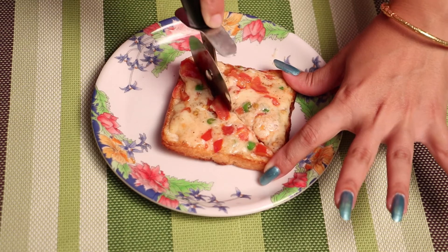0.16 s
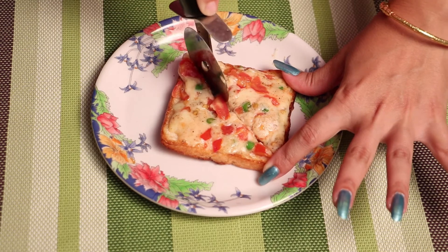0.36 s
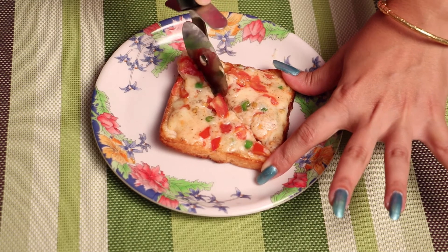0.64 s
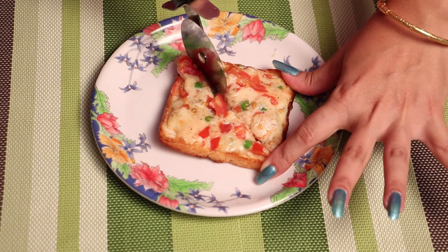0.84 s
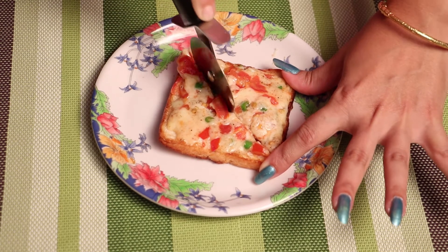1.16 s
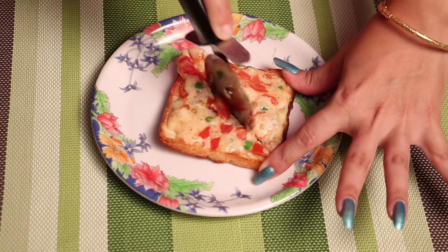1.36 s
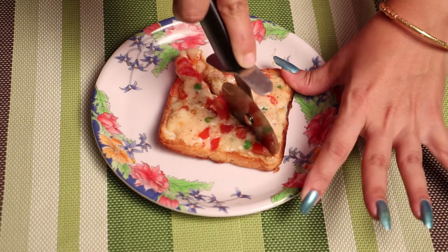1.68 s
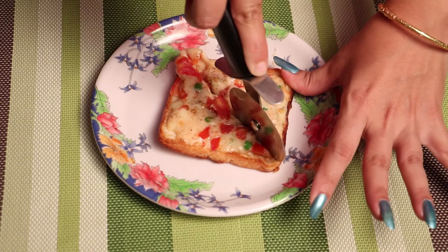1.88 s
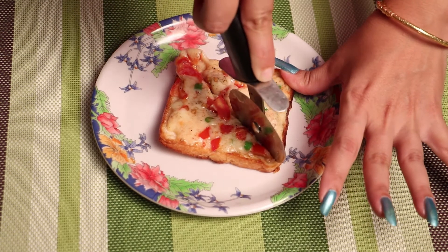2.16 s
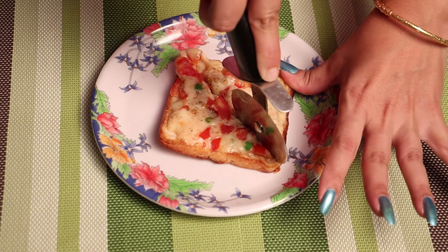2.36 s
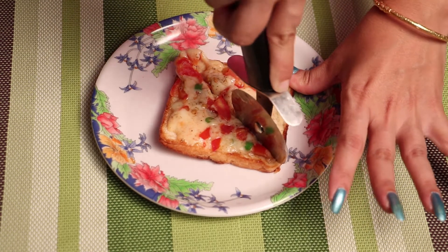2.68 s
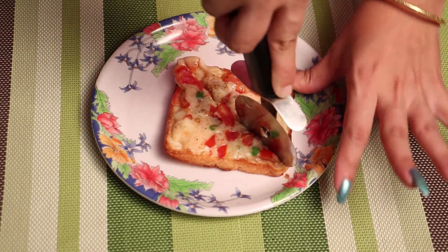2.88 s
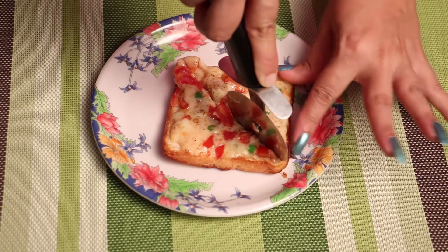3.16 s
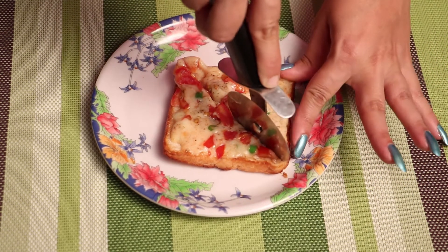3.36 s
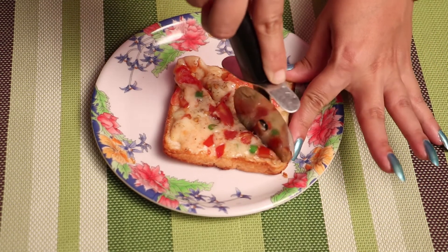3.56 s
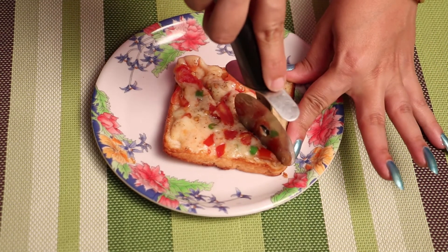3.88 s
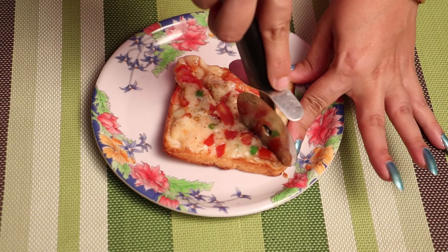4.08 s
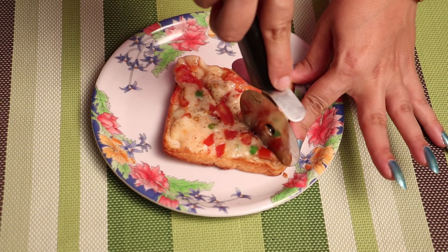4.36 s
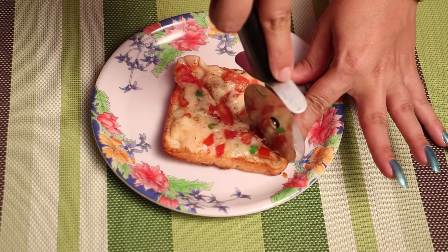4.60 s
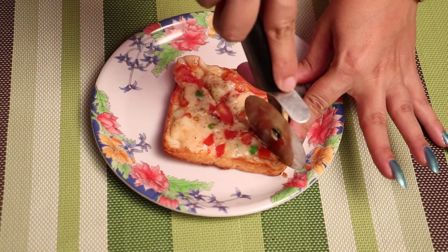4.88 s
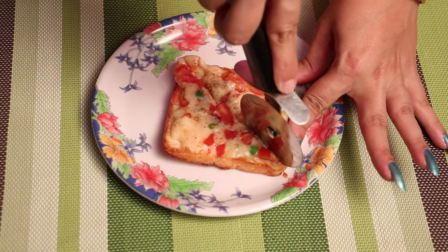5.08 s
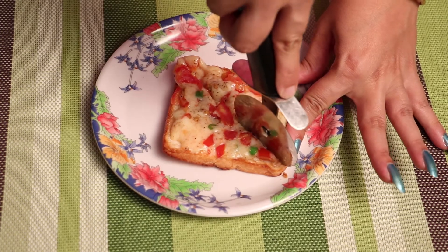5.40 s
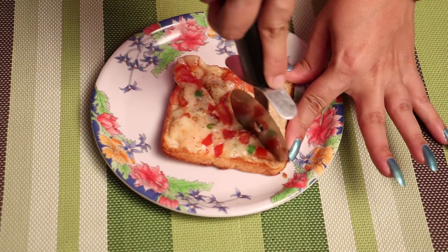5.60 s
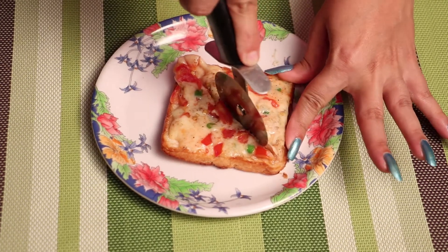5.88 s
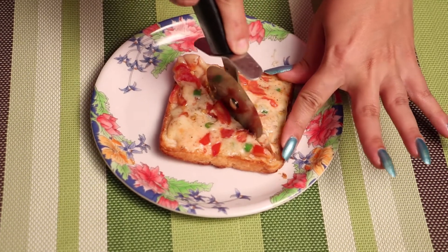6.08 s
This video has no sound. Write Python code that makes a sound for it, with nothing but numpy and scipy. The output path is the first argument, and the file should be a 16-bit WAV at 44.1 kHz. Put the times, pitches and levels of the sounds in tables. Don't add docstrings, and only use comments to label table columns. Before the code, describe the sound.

Crisp bread breaks in irregular, dry, bright cracks under a rolling metal cutter, starting abruptly and loudest in the first second. A hard thud and ceramic clack lands around one and a half seconds. Later come scattered crumbs, hollow plate rocking, tiny metallic ticks and a last quieter run of crunches. Close microphone, bare reverberant kitchen, soft low rumble, motor hum and slight hiss.

```python
import sys
import numpy as np
from scipy import signal
from scipy.fft import rfft, irfft
from scipy.io import wavfile

SR = 44100
rng = np.random.default_rng(int(sys.argv[2]) if len(sys.argv) > 2 else 0)


def digitize_waveform(pressure):
    field = np.atleast_2d(pressure).T
    bounded = np.clip(field, -1, 1)
    quanta = np.round(bounded * 32767).astype(np.int16)
    wavfile.write(sys.argv[1], SR, quanta)


def decibels_to_gain(level_db):
    exponent = np.asarray(level_db, float) / 20
    return 10 ** exponent


N = 275130

# start in seconds, peak level in dB, share of big flakes in dB.
FIRST_ROLL = [(0.0014, -12, -7), (0.0863, -18.5, -4.5), (0.14, -25, 1), (0.1476, -23.5, -0.5),
              (0.2024, -19, -3), (0.208, -27.5, 9), (0.212, -26, 4), (0.237, -15.5, -4.5), (0.261, -27, -5),
              (0.3027, -18, -14), (0.3144, -19, -17), (0.3245, -16.5, -15), (0.333, -20, -12),
              (0.3453, -30.5, 9), (0.3635, -17, -6.5), (0.404, -14.5, -10), (0.428, -18.5, -11.5),
              (0.4433, -18.5, -12), (0.4943, -33, -6), (0.5066, -19, 4), (0.5592, -19, -3),
              (0.5677, -9.5, -14), (0.5729, -15.5, -4), (0.6608, -19, -5), (0.718, -17.5, -7),
              (0.7236, -20.5, -16), (0.7604, -22, -21)]
SECOND_ROLL = [(0.896, -39, 5), (0.939, -41, -4), (0.9496, -37, -9), (0.9989, -24.5, -5), (1.013, -32, 1),
               (1.038, -29, -4), (1.0444, -23, -2), (1.0501, -18, 1.5), (1.0582, -16, -1), (1.063, -21, -5),
               (1.118, -25, -6), (1.1619, -21.5, -9), (1.185, -26, 0), (1.245, -29, -3), (1.2555, -36, -11),
               (1.262, -30.5, 4), (1.2995, -39, -8), (1.311, -30, -2), (1.316, -25, 0), (1.3337, -26, 1.5),
               (1.347, -27, -4), (1.3604, -24, 0), (1.393, -30, 4.5), (1.4447, -17.5, -19),
               (1.457, -27, -2), (1.498, -19.5, -2), (1.531, -19, -14), (1.558, -21.5, -8),
               (1.585, -26.5, 2)]
THIRD_ROLL = [(1.703, -31, -9), (1.728, -27, -3), (1.775, -32.5, -2), (1.797, -30, -1.5), (1.809, -29, -4),
              (1.8332, -25, -7), (1.8606, -23, -12), (1.8928, -22.5, -6), (1.9015, -19.5, -5),
              (1.9607, -33, -15), (1.9896, -21.5, -10.5), (2.092, -30, 1.5), (2.1, -12.5, -13.5),
              (2.148, -29, 1), (2.1577, -25, -14), (2.3137, -24.5, -2.5), (2.334, -44, -20),
              (2.3477, -20, -13), (2.391, -43, -13), (2.4063, -30, -5), (2.415, -34, -13),
              (2.4518, -30, -6), (2.491, -27, -15)]
ROCKING = [(2.612, -46, -2), (2.7495, -36, -4.5), (2.82, -43, -25), (2.829, -32.5, -20), (2.838, -33, -15),
           (2.8576, -39, -13), (2.872, -27, -18), (2.877, -22, -24), (2.8825, -19, -12), (2.899, -33, -7),
           (2.902, -33.5, -13), (2.992, -36, -2), (2.998, -41.5, 4.5), (3.0373, -27.5, -13),
           (3.0484, -37, -12), (3.13, -47, 10), (3.15, -47, -2), (3.251, -49, 3), (3.2633, -35.5, 2.5),
           (3.697, -43, -3), (3.7358, -31.5, -3.5), (3.8026, -31, -14)]
SAWING = [(4.025, -26, -14), (4.0289, -23, -6.5), (4.0447, -20, -11), (4.0614, -23, -20),
          (4.0664, -25, -14), (4.0866, -39, -19), (4.176, -38, -25), (4.2102, -25.5, -11.5),
          (4.273, -50, -20), (4.3002, -48, -17), (4.3221, -36.5, -4.5), (4.345, -45, -12),
          (4.4716, -45.5, 12.5), (4.4786, -30.5, -28), (4.496, -39, 2), (4.844, -37, 0), (4.8604, -31, -10),
          (4.8837, -39.5, 14.5), (5.001, -44, -17), (5.031, -42, -18), (5.047, -41, -17), (5.063, -40, -10),
          (5.1, -43, -15), (5.118, -45, -20), (5.163, -43, -10), (5.1851, -43, -25), (5.2055, -39, -10),
          (5.2257, -28, -3), (5.235, -19.5, 0.5), (5.2424, -37, -17), (5.253, -34, -20), (5.31, -49, -25),
          (5.42, -43.5, -8)]
LAST_ROLL = [(5.585, -46, -8), (5.5967, -47, -2), (5.6143, -43, -2), (5.6746, -32.5, -7), (5.709, -26, -7),
             (5.723, -36, -10), (5.739, -41, -15), (5.7473, -35, -9), (5.761, -28, -12),
             (5.7774, -21.5, -3), (5.7915, -19, -7.5), (5.8431, -43, -26), (5.869, -32, -10),
             (5.89, -30, -11), (5.915, -37, -9), (5.925, -39, -10), (5.9438, -27, -16), (5.9763, -31, -17),
             (6.008, -30, -2), (6.0415, -28.5, -10), (6.0544, -31, -8), (6.0845, -24, -7),
             (6.0915, -25.5, -6), (6.111, -32, -6), (6.133, -33, -3), (6.141, -31, -6), (6.149, -32, -9),
             (6.1605, -25, -6), (6.172, -29.5, -2), (6.204, -33, -12)]
# start in seconds, peak level in dB, share of
# big flakes in dB.
STRAY_CRUMBS = [(1.2323, -36, -2), (2.915, -40, 6), (3.635, -43, -8), (3.684, -47, 0), (3.713, -40, -2),
                (3.75, -43, -3), (3.762, -38, -4), (4.052, -36, -1), (5.701, -43, -9)]
CRUMBS_DB = [-25, -13, -17, -15, -13.5, -22, -18]
CRUMBS_PER_FLAKE = -0.35

# start in seconds, hold in seconds, crunch level in dB,
# share of big flakes in dB, level of the plate rubbing in dB.
PUSHES = [(0.0, 0.0049, -33, 4, -35.5), (0.175, 0.069, -42.5, 4, -42.5), (0.296, 0.14, -45.5, 7, -52.5),
          (0.517, 0.24, -53, 13, -48), (1.041, 0.011, -39.5, 3, -39.5), (1.09, 0.08, -44, 8, -89),
          (1.26, 0.15, -39, 6.5, -49.5), (1.495, 0.074, -46, -6, -43.5), (1.795, 0.15, -46, 0.5, -53),
          (2.108, 0.055, -45.5, -8, -52.5), (2.312, 0.18, -49.5, -5, -66.5), (2.603, 0.14, -59.5, -15, -78),
          (2.853, 0.028, -47, 1.5, -54), (3.055, 0.22, -61, -2, -67), (3.697, 0.069, -57, 4, -62),
          (4.05, 0.02, -66, 13, -55.5), (4.858, 0.033, -54, -1, -56), (5.224, 0.024, -43, -4, -48.5),
          (5.277, 0.043, -73, -4, -62), (5.606, 0.063, -51, -8, -68), (5.722, 0.12, -38.5, 1.5, -47),
          (5.92, 0.14, -44.5, 5, -60.5), (6.126, 0.061, -47, 5.5, -57.5)]
BITE_DB_PER_S, CRUNCH_FALL_DB_PER_S, RUB_FALL_DB_PER_S = 441, 197, 65

# pitch in Hz, width in Hz, level in dB.
CRUST_FAR = [(2400, 300, 1), (3240, 270, -2), (3890, 710, -8.5), (5670, 450, -1.5), (6200, 340, -3),
             (7600, 740, -5), (8720, 530, -4), (9400, 700, 5), (12100, 1400, -21), (13600, 2800, -11)]
CRUST_CORNER = [(2380, 450, 1.5), (2700, 660, -2), (3130, 320, -5), (5700, 720, 0.5), (6270, 320, 1),
                (7540, 250, 0), (8800, 430, 3), (9700, 530, -2), (12000, 1400, -22), (13600, 2700, -15)]
CRUST_SCORED = [(2330, 160, 0), (2700, 470, -0.5), (3730, 330, -6), (5370, 180, 2), (6300, 400, -4.5),
                (7600, 450, -2.5), (8100, 400, -1), (9150, 790, -1), (10300, 600, -17), (13400, 3600, -12)]
CRUST_NEAR = [(2430, 190, 1), (3530, 430, -1.5), (4400, 1200, -5.5), (5590, 330, 1.5), (7000, 730, -4.5),
              (7440, 500, -11), (8270, 630, -2.5), (8600, 1750, 0), (11900, 540, -4.5), (14000, 2500, -10)]
CRUST_ROCKED = [(2410, 270, 0), (3100, 250, -18), (3450, 470, -0.5), (5630, 310, -1.5), (6250, 510, -3),
                (7140, 600, -7), (8340, 400, -1), (8900, 790, -0.5), (11000, 950, -6.5), (12500, 1700, -7)]
CRUST_MIDDLE = [(2430, 130, 4.5), (3250, 120, 4.5), (4200, 910, -9), (5850, 610, -2), (6300, 260, -14),
                (7160, 1400, -13), (8560, 600, 1), (9700, 580, -1.5), (12000, 1300, -16),
                (13500, 4100, -14)]
CRUST_HARD = [(2320, 330, 2), (2960, 400, -1), (4200, 310, -13), (4820, 540, 4), (6000, 310, 0.5),
              (7450, 600, -18), (8100, 320, 4), (9100, 690, 1.5), (12600, 460, 1), (13500, 2100, -7)]
CRUST_BROKEN = [(2490, 270, 6.5), (3360, 180, 2), (4400, 500, -15), (5300, 480, -1), (6760, 260, 1.5),
                (7600, 710, -12), (8360, 590, -0.5), (9560, 600, 0.5), (12400, 500, -4), (14000, 1800, -9)]
CRUST_SPLIT = [(2680, 300, 1), (3740, 190, 1), (2170, 520, -1), (5020, 220, -0.5), (6600, 400, -7),
               (7600, 280, 1), (8650, 580, -5.5), (9900, 680, -4.5), (12100, 800, -5.5), (14400, 1800, -20)]
CRUST_EDGE = [(2090, 200, 1), (3100, 410, 2.5), (3730, 570, -22), (4350, 340, -2), (5230, 390, 3),
              (6360, 500, -11), (7530, 400, 3), (8900, 1100, 1), (12300, 1000, -7), (14400, 1800, -24)]
PLACES_FROM_S = [0, .85, 1.22, 1.65, 2.56, 3.95, 4.28, 4.95, 5.55, 5.88]

# start in seconds, peak level in dB, pitch in Hz.
FLAKES = [(.087, -34, 5700), (.325, -20, 6000), (.3645, -27, 5700), (.5082, -17, 5700), (.5748, -27, 5840),
          (1.3605, -30, 2700), (1.446, -16, 3060), (2.878, -32, 3670), (3.039, -39, 3100),
          (3.738, -36, 4380), (4.0455, -34, 8600), (4.087, -35, 5000), (4.48, -41, 8100),
          (4.498, -38, 4900), (5.749, -36, 5000), (6.087, -28, 3030), (6.162, -29, 2970)]

# start in seconds, table thud in dB, brightness in dB, plate clack in dB.
KNOCKS = [(0.001, -19, -16, -15), (0.508, -32, 4, -26), (0.575, -29.5, 16.5, -23.5),
          (0.599, -30.5, 10, -39), (1.047, -27, 2, -29), (1.062, -18.5, 0, -35), (1.136, -26, -32.5, -61),
          (1.4445, -5, 3, 0.5), (1.453, -43, 6, -35), (2.089, -17, 2, -39), (2.884, -41, 24, -37),
          (2.985, -48, 25, -58), (3.686, -35.5, 1, -54), (4.03, -26.5, -2, -64), (4.936, -34, -21, -62),
          (5.2366, -16, -13.5, -23.5), (5.421, -26.5, -25.5, -31), (5.453, -32, 11, -68),
          (5.525, -39, -19, -76), (5.777, -18, -12.5, -29)]
# start in seconds, table thud in dB, brightness in dB, plate clack in dB.
BOUNCES = [(.008, -25, 9, -45), (.025, -27, 5, -50), (0.046, -37, 3, -41), (0.087, -29, -6, -45),
           (1.069, -21.5, 4, -49), (1.178, -28, -7, -57), (1.21, -33.5, 1, -51), (1.265, -34, 2, -55),
           (1.321, -36, 3, -53), (1.453, -34, 2, -35), (1.46, -24, -7, -21), (1.468, -27, 1, -26),
           (1.483, -30, -8, -34), (1.489, -32, 14, -37), (1.521, -27, -3, -18), (1.59, -34, -5, -31),
           (2.891, -40, 28, -46), (2.991, -52, 1, -57), (5.291, -46, -15, -50), (5.35, -41, -8, -52),
           (5.474, -39, -4, -57)]
# pitch
# in Hz, width in Hz, level in dB.
THUD_MODES = [(59.5, 27, -12), (109.6, 7.5, -3), (146, 4.7, -41), (171.4, 5.6, 7.5), (234.4, 77, 1.5),
              (323, 48, -4), (399, 83, -3), (508.4, 68, 1), (639, 41, -5)]
# pitch in Hz, width in Hz, level in dB.
PLATE = [(739, 86, 2), (887, 86, 1), (1086, 65, 0), (1256, 83, -0.5), (1375, 120, -2.5), (1520, 180, -3.5),
         (1677, 140, -1.5), (2236, 93, -7), (2765, 350, -8)]
# start in seconds, peak level in dB, pitch in Hz.
PLATE_NOTES = [(2.886, -34.5, 431), (2.888, -27.5, 646), (2.94, -38, 660), (2.985, -33, 630), (3.04, -43, 666),
               (3.065, -44, 630), (3.686, -37, 412), (4.04, -30, 672), (4.09, -30, 635), (5.243, -24.5, 658),
               (5.29, -42, 667), (5.335, -31.5, 660), (.004, -17, 1696), (0.039, -29, 1770), (.512, -26, 1500),
               (1.449, -13.5, 863), (1.47, -15.5, 1350), (5.24, -28, 1820), (5.3, -32, 1760)]

# start in seconds, peak level in dB.
TICKS = [(3.038, -54), (4.835, -62), (4.843, -56), (4.849, -46), (4.863, -47.5), (4.872, -50), (4.886, -51),
         (4.9047, -58), (4.918, -54)]
# pitch in Hz, level in dB, time to fall by 60 dB in seconds.
WHEEL = [(2270, -6, 0.027), (2810, 3.5, .012), (4790, -1, 0.028), (4900, -22, 0.04), (6530, -4, 0.02),
         (8200, 0, 0.046), (8100, -13, 0.067), (12500, -17, .03), (13800, -6, .02)]

# pitch in Hz, time to fall by 60 dB in seconds, level in dB.
ROOM = [(100, 1.6, 3), (226, 0.94, 4.5), (624, 0.84, -0.5), (1670, 0.81, 1), (2100, 0.65, -5.5),
        (4950, 0.47, -8), (8900, 0.46, -6), (15000, 0.26, -13)]
# pitch in Hz, level in dB per Hz.
AIR = [(33, -34), (41, 7), (62, -10), (82, -11), (110, 1.5), (170, 1.5), (250, 0), (500, -0.5), (900, -2.5),
       (1300, -12.5), (1800, -21), (3000, -26.5), (8000, -38.5), (16000, -53)]
# pitch in Hz, rms level in dB, flutter in dB.
HUM = [(45, -62.5, -5.5), (192, -45, 1.5), (249.2, -64.5, 6.5), (311, -62.5, 4), (506, -65.5, 8)]


def rms_one(x):
    return x / np.sqrt(np.mean(x ** 2) + 1e-20)


def drift(rate):
    r = np.exp(-80 * np.pi * rate / SR)
    noise = rng.standard_normal(N // 40 + 2002)
    slow = signal.lfilter([1], [1, -2 * r, r * r], noise)[2000:]
    return np.interp(np.arange(N) / 40, np.arange(len(slow)), rms_one(slow))


def train(times, gains):
    out = np.zeros(N)
    at = np.minimum((np.asarray(times) * SR).astype(int), N - 1)
    np.add.at(out, at, gains)
    return out


def soften(x, fall_s):
    return signal.lfilter([1], [1, -np.exp(-1 / (fall_s * SR))], x)


def puffs(clicks, rise_s, fall_s):
    return soften(clicks, fall_s) - soften(clicks, np.minimum(rise_s, 0.8 * fall_s))


def resonate(x, hz, width_hz):
    r = np.exp(-np.pi * width_hz / SR)
    feed = [(1 - r * r) / 2, 0, (r * r - 1) / 2]
    back = [1, -2 * r * np.cos(2 * np.pi * hz / SR), r * r]
    return signal.lfilter(feed, back, x + 1e-18)


def ring(clicks, hz, t60):
    r = decibels_to_gain(-60 / (t60 * SR))
    w = 2 * np.pi * hz / SR
    return signal.lfilter([0, np.sin(w)], [1, -2 * r * np.cos(w), r * r], clicks + 1e-18)


def shaped(x, hz, level_db):
    bins = np.maximum(np.arange(len(x) // 2 + 1) * SR / len(x), 1)
    return irfft(rfft(x) * decibels_to_gain(np.interp(np.log(bins), np.log(hz), level_db)), len(x))


def pushes():
    s, hold_s, crunch_db, low_db, rub_db = np.transpose(PUSHES)[:, :, None]
    t = np.arange(0, N, 32) / SR
    before = np.maximum(s - t, 0)
    after = np.maximum(t - s - hold_s, 0)
    crunch = decibels_to_gain(crunch_db - BITE_DB_PER_S * before - CRUNCH_FALL_DB_PER_S * after) + 1e-9
    rub = decibels_to_gain(rub_db - BITE_DB_PER_S * before - RUB_FALL_DB_PER_S * after) + 1e-9
    total = crunch.sum(0)
    low_share_db = (crunch * low_db).sum(0) / total
    controls = 20 * np.log10(total), low_share_db, 20 * np.log10(rub.sum(0))
    return [np.interp(np.arange(N) / SR, t, c) for c in controls]


def snaps():
    passes = FIRST_ROLL, SECOND_ROLL, THIRD_ROLL, ROCKING, SAWING, LAST_ROLL, STRAY_CRUMBS
    rows = []
    for snaps_in_pass, crumbs_db in zip(passes, CRUMBS_DB):
        for s, peak_db, low_db in snaps_in_pass:
            rows.append((s, peak_db, low_db, crumbs_db + CRUMBS_PER_FLAKE * low_db))
    return np.transpose(rows)


def crust(crunch_db, low_share_db):
    s, peak_db, low_db, high_db = snaps()
    scatter_db = 1.93 * rng.standard_normal((len(s), 10))
    tearing = rng.standard_normal(N)
    sizes = decibels_to_gain(1.9 * np.minimum(rng.exponential(1, N), 5))
    born = rng.random(N) < 1300 * decibels_to_gain(3.5 * drift(40)) / SR
    fractures = rms_one(soften(sizes * born, fall_s=0.00049))

    def breaking(share_db, crunch_share_db, order=0):
        gains = decibels_to_gain(peak_db + share_db + 12.5)
        crack = (-1) ** order * decibels_to_gain(2.0) * train(s + 0.001094, gains)
        snap = puffs(train(s + 0.00026, gains), rise_s=0.0006, fall_s=0.00088)
        early = train(np.maximum(s - 0.003, 0), gains)
        fray = decibels_to_gain(-12.5) * puffs(early, rise_s=0.0034, fall_s=0.0049)
        fine = fractures * decibels_to_gain(crunch_db + 2.0 + crunch_share_db)
        return crack + np.roll(tearing, 997 * order) * (snap + fray + fine)

    broad = signal.butter(2, [1900, 10500], "band", fs=SR, output="sos")
    out = decibels_to_gain(-11.0) * signal.sosfilt(broad, breaking(0.5 * low_db, 0.5 * low_share_db))
    places = (CRUST_FAR, CRUST_CORNER, CRUST_SCORED, CRUST_NEAR, CRUST_ROCKED,
              CRUST_MIDDLE, CRUST_HARD, CRUST_BROKEN, CRUST_SPLIT, CRUST_EDGE)
    starts = [int(t * SR) for t in PLACES_FROM_S] + [N]
    for k in range(10):
        if k < 3:
            share_db = low_db + 5.5
        elif k > 6:
            share_db = high_db + 8.5
        else:
            share_db = 0 * s
        crunch_share_db = low_share_db * (k < 3) + 0.52 * drift(15.0)
        source = breaking(share_db + scatter_db[:, k], crunch_share_db, order=k + 1)
        for modes, start, end in zip(places, starts, starts[1:]):
            hz, width_hz, level_db = modes[k]
            out[start:end] += decibels_to_gain(level_db) * resonate(source[start:end], hz, width_hz)
    thin = signal.butter(3, 1900, "high", fs=SR, output="sos")
    return signal.sosfilt(thin, out)


def flakes():
    out = np.zeros(N)
    for s, peak_db, hz in FLAKES:
        out += ring(train([s], decibels_to_gain(peak_db)), hz, 49 / hz)
    return out


def knocks(rumble_db):
    s, thud_db, bright_db, clack_db = np.transpose(KNOCKS + BOUNCES)
    grumble = decibels_to_gain(rumble_db + 3.1 * drift(22.0)) * rng.standard_normal(N)
    scatter_db = 2.5 * rng.standard_normal((len(s), 18))
    s = s + 0.00168
    back = s + 0.001356
    thud, clack, chatter = np.zeros(N), np.zeros(N), rng.standard_normal(N)
    for k, (hz, width_hz, level_db) in enumerate(THUD_MODES):
        tilt_db = bright_db * ((hz / 520) ** 2 - 0.5)
        gains = decibels_to_gain(thud_db + tilt_db + scatter_db[:, k] + 34)
        push = -0.35 * train(s, gains) + 0.75 * train(back, gains) + decibels_to_gain(12.5) * grumble
        thud += decibels_to_gain(level_db) * resonate(push, hz, width_hz)
    for k, (hz, width_hz, level_db) in enumerate(PLATE):
        hit_db = clack_db + scatter_db[:, 9 + k]
        click = (-1) ** k * decibels_to_gain(7.5) * train(s, decibels_to_gain(hit_db + 15.5))
        burst = puffs(train(s, decibels_to_gain(hit_db + 19.0)), rise_s=0.0016, fall_s=0.003)
        rattle = click + decibels_to_gain(-10.0) * np.roll(chatter, 997 * k) * burst
        clack += decibels_to_gain(level_db) * resonate(rattle + decibels_to_gain(6.0) * grumble, hz, width_hz)
    soft = signal.butter(3, 900, fs=SR, output="sos")
    firm = signal.butter(2, 45, "high", fs=SR, output="sos")
    return signal.sosfilt(np.vstack([soft, firm]), thud) + clack


def hollow():
    out = np.zeros(N)
    for s, peak_db, hz in PLATE_NOTES:
        touch = soften(train([s], decibels_to_gain(peak_db - 23.0)), fall_s=0.00013)
        for pair in (0.985, 1.025):
            out += ring(touch, hz * pair, t60=0.06)
    return out


def wheel():
    s, peak_db = np.transpose(TICKS)
    scatter_db = 3 * rng.standard_normal((len(s), len(WHEEL)))
    out = np.zeros(N)
    for k, (hz, level_db, t60) in enumerate(WHEEL):
        out += ring(train(s, decibels_to_gain(peak_db + level_db + scatter_db[:, k] + 6.0)), hz, t60)
    return out


def kitchen(x):
    hz, t60, level_db = np.transpose(ROOM)
    t = np.arange(2 * SR) / SR
    edges = 40 * 2 ** np.arange(0, 9, 0.5)
    white = rng.standard_normal((2, len(t)))
    echoes = np.zeros(len(t))
    for k, (low, high) in enumerate(zip(edges, edges[1:])):
        half_octave = signal.butter(2, [low, high], "band", fs=SR, output="sos")
        band = signal.sosfilt(half_octave, white[k % 2])
        at = np.log(low * high) / 2
        fall = decibels_to_gain(-60 * t / np.interp(at, np.log(hz), t60))
        level = decibels_to_gain(np.interp(at, np.log(hz), level_db))
        echoes += band * fall / np.sqrt(np.sum(fall ** 2)) * level
    opening = np.clip((t - 0.006) / 0.0018, 0, 1)
    return signal.fftconvolve(x, echoes * opening)[:N]


def background():
    hz, level_db = np.transpose(AIR)
    swell_db = drift(0.6)
    air = decibels_to_gain(-48 + swell_db) * rms_one(shaped(rng.standard_normal(N), hz, level_db))
    t = np.arange(N) / SR
    for tone_hz, tone_db, flutter_db in HUM:
        wander = np.cumsum(1.04 * drift(9.1)) / SR
        level = np.sqrt(2) * decibels_to_gain(tone_db + flutter_db * drift(18.0))
        air += level * np.sin(2 * np.pi * (tone_hz * t + wander))
    return air


def scene():
    crunch_db, low_share_db, rub_db = pushes()
    near = crust(crunch_db, low_share_db) + flakes() + knocks(rub_db) + hollow() + wheel()
    return np.tile(near + kitchen(near) + background(), (2, 1))


def low_pass(x):
    return signal.sosfilt(signal.butter(12, 16510, fs=SR, output="sos"), x)


def record(dry):
    hiss = decibels_to_gain(-61.0) * rng.standard_normal((2, N))
    flicker = decibels_to_gain(-78.0) * rms_one(resonate(rng.standard_normal((2, N)), 49, 27))
    rounded = 1.068 * np.tanh(dry / 1.241)
    top = signal.cheby2(12, 30, 15850, fs=SR, output="sos")
    bottom = signal.butter(4, 36, "high", fs=SR, output="sos")
    mix = signal.sosfilt(np.vstack([top, bottom]), rounded + hiss + flicker)
    return low_pass(mix)


dry = scene()
out = record(dry)
digitize_waveform(out)
```